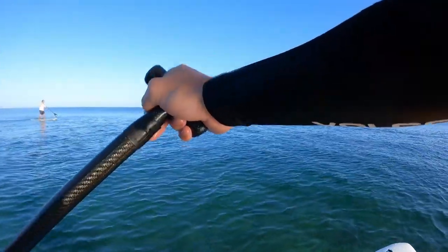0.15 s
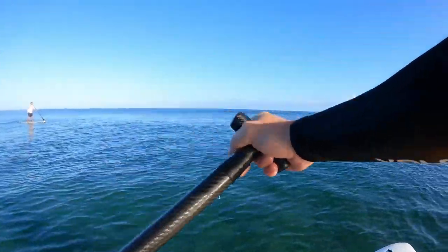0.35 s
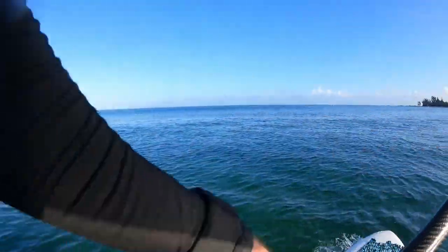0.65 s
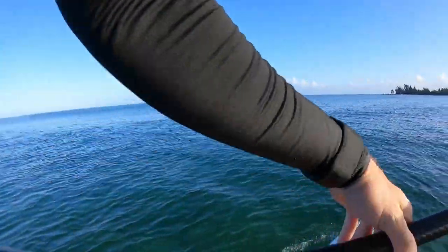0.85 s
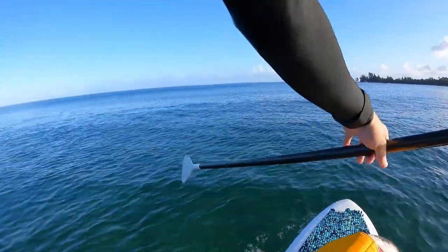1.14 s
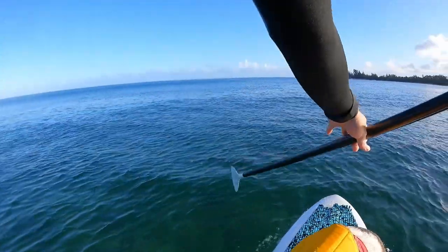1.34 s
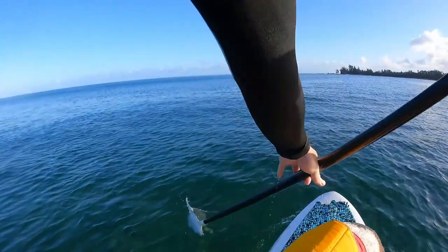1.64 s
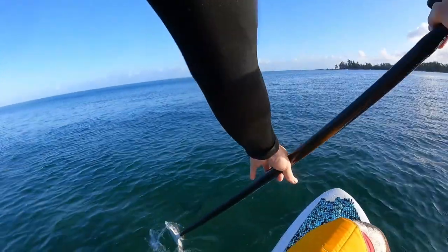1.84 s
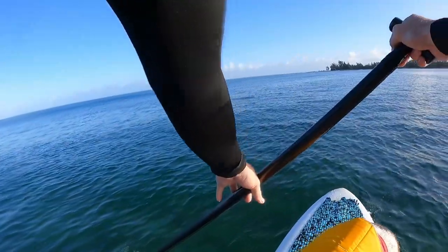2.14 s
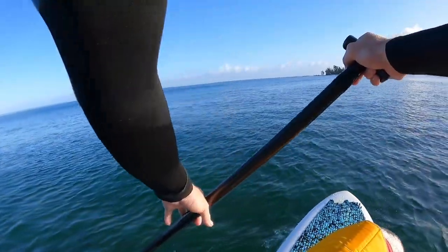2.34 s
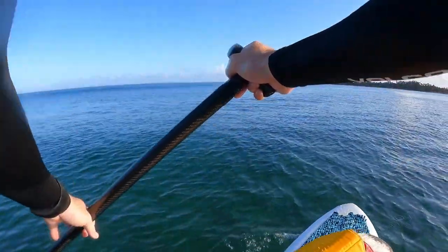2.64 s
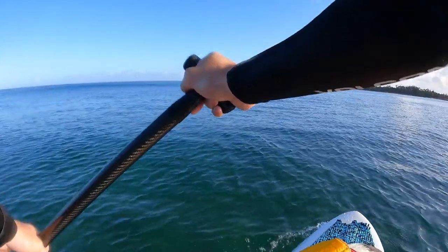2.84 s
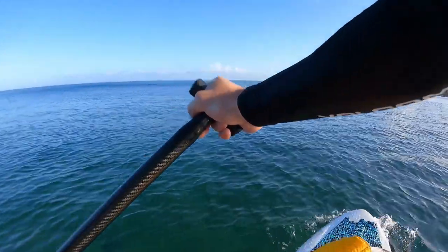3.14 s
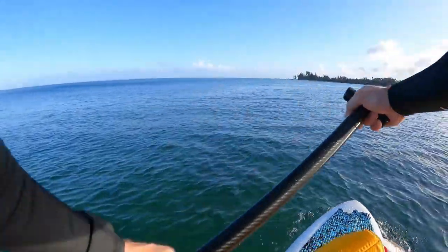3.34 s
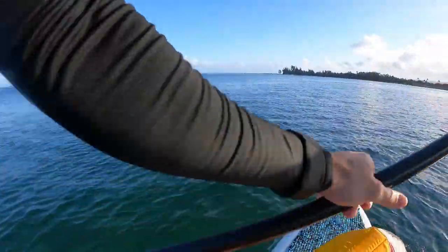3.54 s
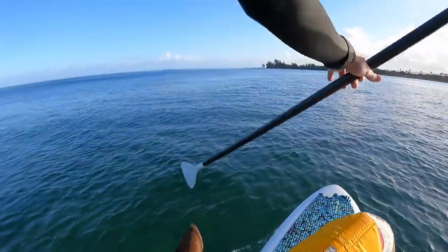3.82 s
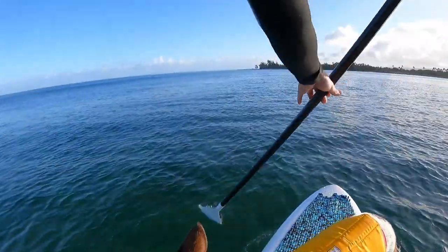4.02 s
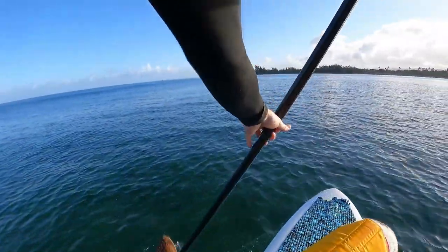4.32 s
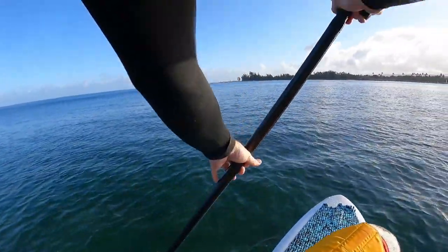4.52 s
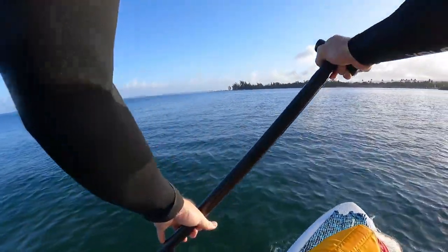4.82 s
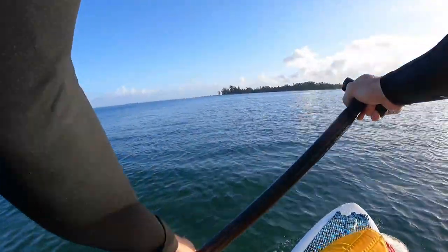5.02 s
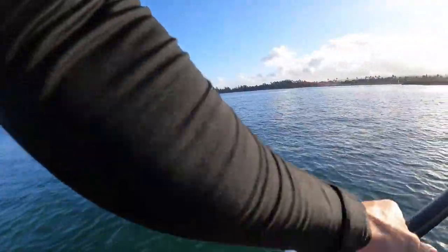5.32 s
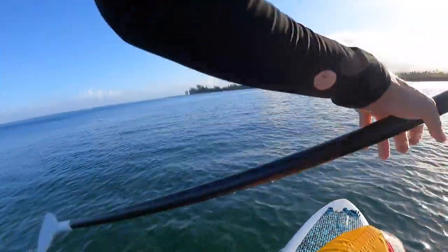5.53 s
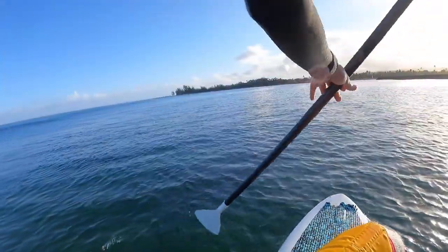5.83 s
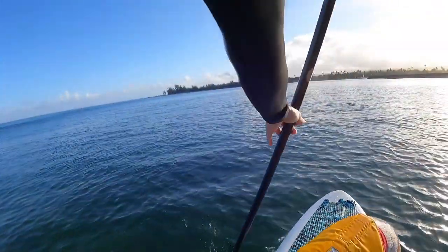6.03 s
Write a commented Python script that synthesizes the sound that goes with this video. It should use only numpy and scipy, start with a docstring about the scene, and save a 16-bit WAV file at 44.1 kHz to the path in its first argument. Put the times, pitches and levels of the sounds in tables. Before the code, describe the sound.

Water gurgles and slops against a paddleboard hull as a blade pulls through, then rushes harder as wind rumbles on the close microphone.

```python
"""Water slops and gurgles at the blade and hull of a paddleboard that picks up speed on a wave.
Splashes are shaped noise, trapped air rings as short decaying tones, and foam is filtered noise and clicks.
Droplets tick and sizzle close to a body camera's microphone, and drops tap its housing.
Wind is noise that rumbles and buffets the microphone harder as the board speeds up, with a loose flutter."""
import sys
import numpy as np
from scipy import signal
from scipy.fft import rfft, irfft
from scipy.io import wavfile
from scipy.ndimage import uniform_filter1d

SR = 44100
rng = np.random.default_rng(int(sys.argv[2]) if len(sys.argv) > 2 else 0)


def unload_audio(sound):
    """Save the sound as a 16-bit wav file, at the path given as the first command line argument."""
    columns = np.transpose(np.atleast_2d(sound))
    # keep every value between -1 and 1, then stretch to whole-number steps
    steps = np.round(np.clip(columns, -1, 1) * 32767)
    wavfile.write(sys.argv[1], SR, steps.astype(np.int16))


N = 272097
TIME = np.arange(N) / SR

# relative strength of the air stream at the microphone: t/s, level/dB
WIND = [(0.05, -41), (0.9, -42.5), (1.2, -38), (1.55, -37.5), (1.95, -42.5), (2.5, -46.5), (2.95, -41.5),
        (3.4, -45), (4.1, -41.5), (4.35, -41), (4.6, -33), (5.0, -34), (5.3, -24.5), (5.5, -28),
        (5.95, -28), (6.12, -21)]
# paddle strokes: blade enters t/s, pull lasts/s, strength 0-1
STROKES = [(1.92, 0.3, 0.64), (4.433, 0.21, 0.99)]
# swells and troughs passing under the hull: t/s, change/dB, half length/s
SEA_SWELLS = [(.45, -1, 0.32), (1.12, 3.5, 0.25), (1.72, 2.5, 0.24), (2.25, 1.5, 0.24), (2.96, 2.5, 0.16),
              (5.87, -2, 0.084)]
# the chop at the surface livens and slackens: t/s, change/dB, half length/s
CHOP = [(.32, -6, 0.024), (.75, 0, 0.18), (1.1, -4.5, 0.078), (1.31, -5, 0.095), (1.86, -2, .05),
        (2.52, -2, .1), (3.9, 2.5, 0.33), (4.35, -2.5, 0.064), (5.08, -5.5, 0.03), (5.43, -2, 0.041)]
BUILD_S = 0.24  # large bubbles build up gradually as the blade pulls


def amp(db):
    """Decibels to gain."""
    return 10 ** (np.asarray(db) / 20)


def unit(x):
    """Scales to rms 1."""
    return x / np.sqrt(np.mean(x ** 2) + 1e-20)


def level(rows, axis):
    """One dB column of a curve as a gain at every sample."""
    rows = np.array(rows)
    return amp(np.interp(TIME, rows[:, 0], rows[:, axis]))


def swells(rows):
    """Rounded rises and falls, summed in dB."""
    return sum(db * np.exp(-((TIME - s) / half) ** 2) for s, db, half in rows)


def add(mix, s, sound):
    """Mixes a sound in at time s."""
    part = mix[max(round(s * SR), 0):][:len(sound)]
    part += sound[:len(part)]


def colour(x, points, size=8192):
    """Causal minimum-phase filter with the given spectrum, so that attacks stay sharp."""
    hz, db = np.transpose(points)
    bins_hz = abs(np.fft.fftfreq(size, 1 / SR)) + 1
    log_gain = np.log(amp(np.interp(np.log(bins_hz), np.log(hz), db)))
    # the Hilbert transform of the log gain gives the minimum phase
    response = np.exp(np.conj(signal.hilbert(log_gain)))
    impulse = np.fft.ifft(response).real[:size // 2]
    return signal.fftconvolve(x, impulse)[:len(x)]


def muffled(x, edge_hz, order=4):
    """The film of water on the microphone takes off the treble."""
    return signal.sosfilt(signal.butter(order, edge_hz, fs=SR, output="sos"), x)


def drift(per_s):
    """Random wandering of rms 1, mostly slower than per_s."""
    hz = np.fft.rfftfreq(N, 1 / SR)
    return unit(irfft(rfft(rng.standard_normal(N)) / (1 + (hz / per_s) ** 4), N))


def impacts(per_s, spread_db):
    """Randomly timed clicks of either sign, their sizes spread exponentially in dB."""
    size = amp(spread_db * np.minimum(rng.exponential(1, N), 4))
    return size * rng.choice([-1, 1], N) * (rng.random(N) < per_s / SR)


def bubble(hz, cycles, rise, size=4096):
    """An air pocket rings for a few cycles, its pitch rising as it nears the surface."""
    age = np.arange(size) / SR * hz / cycles  # in decay times
    envelope = (1 - np.exp(-age * 4)) * np.exp(-age)
    phase = 2 * np.pi * cycles * (age + rise * (age - 1 + np.exp(-age)))
    return envelope * np.sin(phase)


def bubbling(low_hz, high_hz, cycles, per_s, spread_db, count=24):
    """A crowd of short-lived bubbles; per_s is the rate for each size."""
    crowd = np.zeros(N)
    for hz in np.geomspace(low_hz, high_hz, count):
        ring = bubble(hz, cycles=cycles * rng.uniform(.6, 1.51), rise=0.082)
        crowd += hz * signal.oaconvolve(impacts(per_s, spread_db), ring)[:N]
    return unit(crowd)


def cluster(hz, octaves, size=8192):
    """The blurred ring of many bubbles of about one size."""
    bins_hz = np.fft.rfftfreq(size, 1 / SR) + 1
    away = np.log2(bins_hz / hz) / max(octaves, .05)
    return irfft(rfft(rng.standard_normal(size)) * np.exp(-away ** 2 / 2 - (away / 2) ** 4), size)


def burst(carrier, length, attack_s):
    """Gives a sound a rounded rise and a short fall, with the energy of its envelope."""
    t = np.arange(len(carrier)) / SR
    shape = (1 - np.exp(-(t / attack_s) ** 2)) * np.exp(-(t / max(length, .002)) ** 2)
    return unit(carrier * shape) * np.sqrt(np.mean(shape ** 2))


def eddies(points, steady_s):
    """Turbulent pressure with a given spectrum and an even strength over longer spans."""
    x = colour(rng.standard_normal(N + SR), points)[SR:]  # drops the filter's start
    span = int(steady_s * SR)
    power = uniform_filter1d(uniform_filter1d(x ** 2, span), span)
    return x / np.sqrt(abs(power) + 1e-20)


def stirred(bubbles, wash, strength, bubbles_db, steep):
    """Calm water is an even wash; the harder it is stirred, the more single bubbles stand out."""
    share = amp(bubbles_db) * (strength / np.median(strength)) ** steep
    return strength * (unit(wash) + share * unit(bubbles)) / np.sqrt(1 + share ** 2)


def pull(rise_s):
    """How hard the blade stirs the water: catch, hold and slow settling."""
    release_s = 1
    total = 0
    for s, length, strength in STROKES:
        catch = np.clip((TIME - s) / rise_s, 0, 1)
        settling = np.exp(-np.maximum(TIME - s - length, 0) / release_s)
        total = total + strength * catch * settling
    return total


def entry():
    """The brief throw of water as the blade cuts the surface, at once strong and then falling back."""
    fall_s = 0.25
    return sum(strength * (TIME > s) * np.exp(-abs(TIME - s) / fall_s) for s, _, strength in STROKES)


def ride():
    """Speed gained once the wave picks the board up: 0 while cruising to 1 at full speed."""
    takeoff_s, speedup_s = 4.59, 1.296
    return np.clip((TIME - takeoff_s) / speedup_s, 0, 1)


def flow(calm_db, pull_db, ride_db, bow_share):
    """Level of surface water: it rises with the stroke, the speed and the foam at the bow."""
    # the bow pushes through ripples and throws foam: t/s, rise/dB before bow_share, half length/s
    bow_washes = [(.12, 8, 0.32), (.72, 6.5, 0.22), (1.68, 6.5, 0.2), (2.83, 8.5, 0.15), (3.45, 7, 0.28),
                  (4.13, 4.5, 0.14), (5.28, 7.5, 0.19), (6.1, 8.5, 0.059)]
    catch_s = 0.038  # the blade bites quickly
    return amp(calm_db + pull_db * pull(catch_s) + ride_db * ride() + bow_share * swells(bow_washes))


def wind(rumble_db=-41, rumble_follow=0.53, buffet_db=-0.34):
    """Large eddies rumble at the microphone and swell in gusts, smaller ones buffet above them."""
    # slow gusts in the deep rumble: t/s, rise/dB, half length/s
    gusts = [(1.2, 1.5, 0.57), (3.97, 11.5, 0.15), (4.6, 5.5, 0.069), (5.92, 7.5, 0.11)]
    # spectrum of the large eddies: f/Hz, level/dB
    rumble_tone = [(10, -7.5), (22, 8), (35, 3.5), (55, 8), (80, -7), (160, -40.5), (400, -101.5),
                   (2000, -125)]
    # spectrum of the smaller eddies: f/Hz, level/dB
    buffet_tone = [(30, -32.5), (55, -9.5), (78, 1), (100, -7.5), (140, -5.5), (200, -13.5), (400, -39.5),
                   (1000, -62), (2500, -87), (7000, -125)]
    air = level(WIND, axis=1)
    swell = (air / np.median(air)) ** rumble_follow * amp(rumble_db + swells(gusts))
    rumble = swell * eddies(rumble_tone, steady_s=0.31)
    return rumble + amp(buffet_db) * air * eddies(buffet_tone, steady_s=0.1)


def flutter(hz=94, wander=0.25, gain_db=-5, full_db=-26, steep=1.39, uneven_db=2.5):
    """In fast air, vortices peel off the camera at a loosely regular rate."""
    speed = np.minimum(level(WIND, axis=1) / amp(full_db), 1) ** steep  # saturates at full_db
    turns = np.cumsum(hz * (1 + wander * drift(per_s=24.85))) / SR
    strength = amp(full_db + gain_db + uneven_db * drift(per_s=11)) * speed
    return strength * np.sqrt(2) * np.sin(2 * np.pi * turns)


def puffs(size=8192):
    """A single eddy gives the microphone a soft, heavily damped push."""
    # single puffs: t/s, level/dB before damping, f/Hz
    pushes = [(1.165, -13, 38.6), (3.601, -17, 107), (3.999, -23.5, 46)]
    out, t = np.zeros(N), np.arange(size) / SR
    for s, db, hz in pushes:
        add(out, s, amp(db) * np.sin(2 * np.pi * hz * t) * np.exp(-t * hz / 0.46))
    return out


def roar(calm_db=-40, pull_db=4, ride_db=14, steep=3.5, swell_share=1.0):
    """A dull turbulent rush that swells as the wave takes the board."""
    # surges and lulls under the speeding board: t/s, change/dB, half length/s
    surges = [(4.58, 2, 0.056), (4.71, 7, 0.072), (4.96, 6.5, 0.02), (5.31, 5, 0.038), (5.42, 6.5, 0.05),
              (5.62, 4.5, 0.059), (5.77, 0, 0.04), (5.87, 4, 0.087), (5.95, -3, .025), (6.02, 2.5, .035),
              (6.09, -3.5, 0.044)]
    # spectrum of the rush: f/Hz, level/dB
    tone = [(60, -23.5), (105, -3.5), (165, -0.5), (240, -0.5), (320, -5), (500, -22), (1000, -29),
            (2500, -84), (7000, -120)]
    db = calm_db + pull_db * pull(BUILD_S) + ride_db * ride() ** steep + swell_share * swells(SEA_SWELLS)
    return amp(db + swells(surges)) * eddies(tone, steady_s=0.42)


def churn(calm_db=-42, pull_db=6, ride_db=3.5, chop_share=0.62):
    """Large bubbles gurgle in the even wash along the hull."""
    # spectrum of bubbles and wash: f/Hz, level/dB
    tone = [(100, -31), (220, -14.5), (330, -2), (480, -1.5), (650, -1.5), (800, -8), (1000, -12.5),
            (1300, -22.5), (2000, -46), (7000, -105)]
    bubbles = colour(bubbling(237.5, 1039, cycles=2.38, per_s=26, spread_db=2.5), tone)
    wash = colour(rng.standard_normal(N), tone)
    motion_db = pull_db * pull(BUILD_S) + ride_db * ride()
    strength = amp(calm_db + motion_db + swells(SEA_SWELLS) + chop_share * swells(CHOP))
    return stirred(bubbles, wash, strength, bubbles_db=-1.0, steep=0.14)


def babble(lumpy_db=0.5):
    """Smaller, brighter bubbles, stirred up when the blade pulls and the bow breaks the surface."""
    # spectrum of the wash: f/Hz, level/dB
    wash_tone = [(300, -24.5), (600, -11.5), (800, -1), (1000, -1), (1150, -6.5), (1350, -17), (1650, -25),
                 (2200, -37.5), (3200, -48), (8000, -98)]
    # spectrum of the bubbles: f/Hz, level/dB
    bubble_tone = [(300, -31), (600, -12.5), (800, -2.5), (1000, 1), (1200, -3), (1450, -9), (1750, -19.5),
                   (2300, -29), (3200, -42.5), (8000, -95)]
    bubbles = colour(bubbling(650, 2300, cycles=6, per_s=16, spread_db=2.5), bubble_tone)
    wash = colour(rng.standard_normal(N), wash_tone)
    strength = flow(calm_db=-54.0, pull_db=10.5, ride_db=6.0, bow_share=0.24) * amp(swells(CHOP))
    water = stirred(bubbles, wash, strength, bubbles_db=-2.5, steep=0.35)
    return water * amp(lumpy_db * drift(per_s=24))


def gurgle(gain_db=-43, delay_s=.31, half_s=0.4, clumps_db=2):
    """The whirl behind the blade drags air under, which comes up as round, rising bubbles."""
    whirl = sum(strength * np.exp(-((TIME - s - delay_s) / half_s) ** 2) for s, _, strength in STROKES)
    bubbles = bubbling(380, 1150, cycles=6.5, per_s=5.1, spread_db=2.0)
    bubbles = unit(muffled(bubbles, edge_hz=750, order=2))
    return amp(gain_db + clumps_db * drift(per_s=28)) * whirl * bubbles


def spray(plinks_db=-4, patchy_db=2.0, entry_db=6):
    """Falling drops patter and plink over the hiss of foam."""
    # spectrum of drops and foam: f/Hz, level/dB
    tone = [(600, -26), (1300, 8.5), (2100, 1.5), (2600, -3), (3300, -8), (4200, -13.5), (5200, -16),
            (7000, -25.5), (8500, -43.5), (11000, -59)]
    plinks = colour(bubbling(1400, 3400, cycles=13, per_s=22, spread_db=6.0), tone)
    patter = colour(impacts(per_s=2000, spread_db=1.5), tone)
    drops = unit(patter) + amp(plinks_db) * unit(plinks)
    foam = colour(rng.standard_normal(N), tone)
    strength = flow(calm_db=-70.5, pull_db=8, ride_db=4.5, bow_share=0.75) * amp(entry_db * entry())
    water = stirred(drops, foam, strength, bubbles_db=-3.5, steep=0.77)
    return water * amp(patchy_db * drift(per_s=19))


def sizzle(gain_db=1.5, hiss_db=-7, clumps_db=3):
    """Tiny droplets close to the microphone prickle in a narrow band of high treble."""
    # course of the sizzle: t/s, level/dB before gain_db
    course = [(0.03, -83), (1.08, -94.5), (1.28, -81), (1.65, -88.5), (1.95, -80.5), (2.01, -67),
              (2.02, -79), (3.05, -87), (3.47, -80.5), (3.84, -95), (4.02, -74), (4.26, -85.5), (4.29, -71),
              (4.43, -81), (4.48, -65.5), (4.55, -85), (4.6, -120), (4.65, -114)]
    # spectrum of the droplets: f/Hz, level/dB
    tone = [(9500, -55), (11000, -30.5), (11900, 3.5), (12400, 0.5), (13500, -3), (15000, -5),
            (16000, -10.5)]
    prickle = unit(impacts(per_s=280, spread_db=-1.0)) + amp(hiss_db) * rng.standard_normal(N)
    clumped = prickle * amp(clumps_db * drift(per_s=40))
    return amp(gain_db) * level(course, axis=1) * unit(colour(clumped, tone))


def taps(gain_db=0, size=2048):
    """A stray drop lands on the housing with one short, broad knock."""
    # drops: t/s, peak level/dB
    drops = [(.4855, -44), (1.789, -51), (2.353, -52.5), (4.582, -52), (5.469, -40), (6.078, -48.5)]
    # spectrum of the housing's dull knock: f/Hz, level/dB
    housing = [(300, -4.5), (900, 0), (1400, -2), (2200, 6.5), (2900, -9), (3400, -6), (4000, -2.5),
               (4700, 0.5), (5400, -20), (6500, -32), (9000, -58)]
    out, knock = np.zeros(N), colour(signal.unit_impulse(size), housing)
    for s, db in drops:
        add(out, s, amp(db + gain_db) * knock / abs(knock).max())
    return out


def splats(gain_db=-3, attack_s=0.0021):
    """Thrown water lands and breaks into a cluster of small bubbles."""
    # sharp splats: t/s, level/dB before gain_db, centre f/Hz, fall/s, spread of bubble sizes/octaves
    landings = [(1.974, -48, 1500, 0.019, 0.6), (2.002, -49, 1650, .01, 0.35),
                (2.105, -40, 1500, 0.0074, 0.23), (2.183, -47, 1550, .012, 0.28),
                (2.2, -42.5, 1400, 0.0091, 0.23), (2.333, -50.5, 1550, 0.032, 0.59),
                (2.372, -52, 2200, 0.0067, .15), (3.502, -43.5, 1250, 0.028, 0.18),
                (2.622, -40.5, 1220, 0.027, 0.32), (2.639, -49, 1730, 0.018, 0.44),
                (4.458, -43, 2650, 0.0063, 0.35), (4.4585, -27.5, 1260, 0.0059, 0.36),
                (4.588, -50.5, 1730, 0.023, 0.49), (4.793, -27.5, 1170, 0.007, 0.3),
                (4.802, -52, 2550, 0.0057, .2), (4.906, -53, 2300, 0.0077, 0.22),
                (5.185, -47, 1930, 0.011, 0.23), (5.367, -40.5, 1910, 0.012, 0.25),
                (6.075, -48, 2100, 0.012, 0.3)]
    out = np.zeros(N)
    for s, db, hz, length, octaves in landings:
        add(out, s, amp(db + gain_db) * burst(cluster(hz, octaves), length, attack_s))
    return out


def plops(gain_db=0, rise=0.037):
    """Single large bubbles pinch off, each starting quickly and ringing for only a few cycles."""
    # bubbles: t/s, peak level/dB before muffling, f/Hz, decay/cycles
    pinches = [(.107, -34, 616, 2.7), (1.431, -17, 520, 0.83), (1.439, -27.5, 485, 1.5),
               (1.452, -25, 413, 1.3), (1.461, -31, 720, 2.9), (1.4733, -23.5, 590, 1.4),
               (1.517, -33, 616, 2.5), (1.598, -37, 600, 1.3), (2.114, -37, 790, 1.3),
               (2.187, -26, 483, 1.6), (2.203, -28, 620, 2), (2.226, -23.5, 343, 1.3),
               (2.252, -24.5, 613, 2.8), (2.3465, -25, 790, 1.4), (2.365, -24, 460, 1),
               (2.387, -30, 550, 1.6), (2.411, -29.5, 314, 0.72), (2.42, -31.5, 1100, 2),
               (2.456, -26, 469, 2.5), (2.9905, -19, 524, 2), (3.1135, -29.5, 695, 2),
               (3.274, -35, 940, 1.4), (4.227, -27.5, 872, 2.4), (4.383, -33.5, 726, 2.9),
               (4.672, -24.5, 630, 1), (4.7175, -19.5, 740, 1.5), (4.937, -26.5, 836, 3.9),
               (5.023, -34, 1300, 4.6), (5.056, -33, 646, 1.7), (5.118, -20.5, 840, 0.98),
               (5.3055, -22.5, 700, 4.4), (5.450, -17, 550, 1.9), (5.466, -16.5, 466, 1.1),
               (5.5455, -23.5, 620, 1.9), (5.836, -20.5, 476, 1.3), (5.900, -21.5, 480, 0.95)]
    out = np.zeros(N)
    for s, db, hz, cycles in pinches:
        ring = bubble(hz, cycles, rise)
        add(out, s, amp(db + gain_db) * ring / abs(ring).max())
    return muffled(out, edge_hz=1390)


def slops(splash_db=-8, pocket_db=-11.5, froth_db=-14, froth_octaves=0.2, attack_s=0.0045,
          swell_s=0.0059, wobble=0.04, ragged_db=3, size=8192):
    """Water folds over: a ragged splash, the gulp of the air it traps, and a froth of like-sized bubbles."""
    # slops at blade and hull: t/s, level/dB before the layer gains, pitch of the trapped air f/Hz,
    # fall/s, strength of splash and froth (factor), glide over the fall/octaves
    folds = [(0.225, -15, 520, 0.032, 0.15, -0.026), (0.232, -30, 933, 0.025, 0.35, 0.052),
             (0.574, -28.5, 926, 0.027, 1.1, -0.18), (1.426, -19.5, 930, 0.019, 0.74, -0.049),
             (1.431, -19.5, 418, 0.042, 0.87, -0.34), (1.97, -27, 973, 0.031, 0.82, -0.085),
             (2.043, -25, 692, 0.026, 0.85, -0.057), (2.156, -32, 568, 0.022, 0.5, 0.38),
             (2.22, -16, 1148, 0.0092, 0.41, 0.17), (2.243, -17.5, 616, 0.016, 0.53, 0.014),
             (2.328, -22, 994, 0.027, 0.77, 0.22), (2.342, -15, 656, 0.022, 0.34, -0.2),
             (2.364, -23.5, 522, 0.039, 0.89, 0.15), (2.453, -18, 462, 0.016, 0.26, 0.24),
             (2.747, -18.5, 381, 0.03, 0.27, 0.12), (2.752, -23.5, 932, 0.027, 0.52, -0.079),
             (2.925, -35, 463, 0.053, 0.96, -0.071), (3, -24, 501, 0.023, 1.6, 0.23),
             (3.015, -18, 606, 0.03, 0.41, -0.056), (3.019, -24.5, 972, .016, .5, 0.41),
             (3.06, -25, 664, 0.024, 0.53, 0.15), (3.11, -26, 512, 0.022, 1.9, -0.54),
             (3.268, -28.5, 1130, 0.013, 0.73, 0.077), (3.526, -28.5, 874, 0.052, 0.96, 0.032),
             (3.542, -22, 485, 0.049, 0.43, -0.17), (3.571, -22.5, 379, 0.04, 0.24, -0.37),
             (4.177, -19.5, 439, 0.023, 0.5, -0.041), (4.226, -29.5, 977, 0.026, 1.2, 0.052),
             (4.492, -35, 930, 0.04, 0.49, -0.32), (4.615, -18.5, 836, 0.02, 0.68, 0.093),
             (4.654, -26.5, 1037, 0.025, 1.4, 0), (4.68, -30, 424, 0.044, 2.4, -0.048),
             (4.716, -24, 900, 0.019, 1.03, 0.053), (4.742, -27, 1140, .018, 0.44, 0.33),
             (4.784, -21.5, 728, 0.023, .35, -0.05), (4.86, -28.5, 397.5, 0.094, 0.94, 0.15),
             (4.965, -21.5, 1120, 0.01, 1.5, 0.0087), (5.197, -22, 765, 0.035, .55, 0.29),
             (5.306, -17.5, 709, 0.023, .15, 0.31), (5.323, -17.5, 1040, 0.0096, 0.14, 0.36),
             (5.450, -19, 558, 0.033, 0.32, -0.47), (5.542, -19, 662, 0.038, 0.76, 0.19),
             (5.58, -28, 907, 0.037, 1.1, 0.3), (5.648, -25.5, 1000, 0.018, 0.43, 0.22),
             (5.698, -29, 940, .016, 0.36, 0.12), (5.829, -23, 373, 0.049, 0.72, 0.2),
             (5.943, -27.5, 1000, 0.015, .7, 0.023), (6.008, -32, 1026, 0.015, .4, -.15),
             (6.062, -28, 699, 0.031, 0.82, 0.14)]
    # spectrum of the splash: f/Hz, level/dB
    tone = [(100, -9.5), (250, 7), (400, 5.5), (620, 4.5), (780, -3), (1000, 1.5), (1350, -21.5),
            (1800, -30.5), (3000, -49.5), (6000, -63.5), (9000, -90)]
    out, t = np.zeros(N), np.arange(size) / SR
    unsteady = 1 + wobble * drift(per_s=98)
    ragged = amp(ragged_db * drift(per_s=64))
    for s, db, hz, length, wet, glide in folds:
        rough = rng.standard_normal(size) * np.interp(s + t, TIME, ragged)
        splash = burst(colour(rough, tone), length, attack_s)
        froth = burst(cluster(hz, froth_octaves, size=size), length, attack_s)
        # the pocket glides and wobbles in pitch as the water squeezes it; with little splash it rings clean
        octaves = glide * (np.minimum(t / length, 2) - .5)
        pitch = hz * 2 ** octaves * np.interp(s + t, TIME, unsteady)
        gulp = burst(np.sin(2 * np.pi * np.cumsum(pitch) / SR), length, swell_s)
        water = wet * (amp(splash_db) * splash + amp(froth_db) * froth)
        add(out, s, amp(db) * (water + amp(pocket_db) * gulp))
    return out


def scene():
    """Wind and water at one microphone."""
    air = wind() + flutter() + puffs()
    wash = roar() + churn() + babble() + gurgle() + spray() + sizzle()
    return (air + wash + taps() + splats() + plops() + slops())[None]


def record(dry, hiss_db=-80, edge_hz=15750):
    """The camera's faint, dull self-noise and its band limit."""
    # spectrum of the self-noise: f/Hz, level/dB
    hiss_tone = [(800, -11.5), (2500, 7), (3500, -1.5), (5000, -4), (6500, -13.5), (8000, -24.5),
                 (10000, -35.5), (20000, -37)]
    noisy = dry + amp(hiss_db) * unit(colour(rng.standard_normal(N), hiss_tone))
    band = signal.firwin(511, edge_hz, window=("kaiser", 9), fs=SR)
    return signal.oaconvolve(noisy, band[None], "same")


dry = scene()
out = record(dry)
unload_audio(out)
```